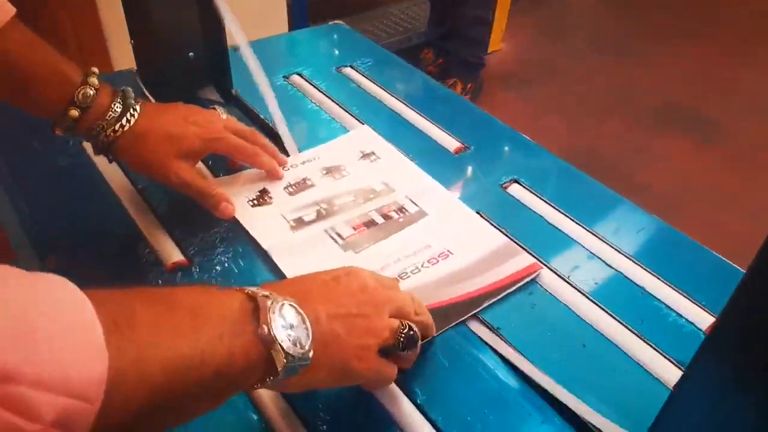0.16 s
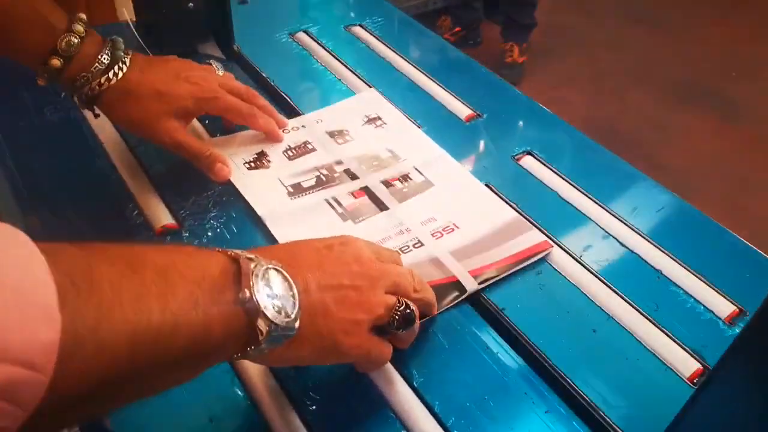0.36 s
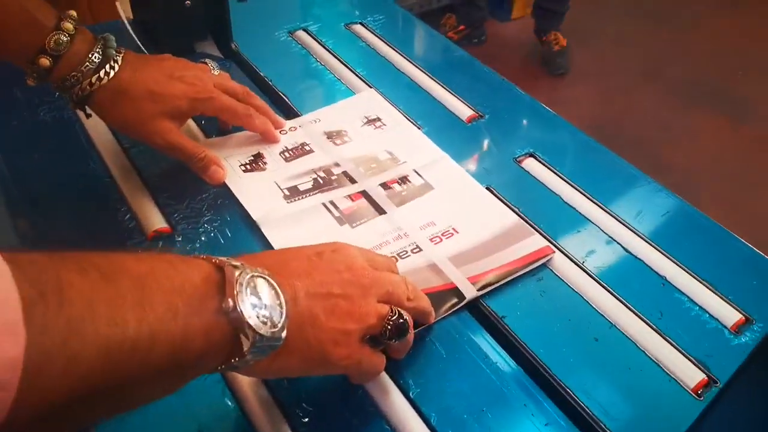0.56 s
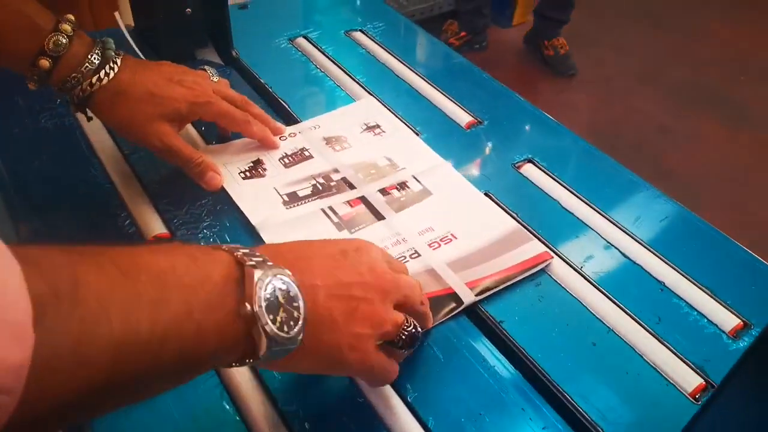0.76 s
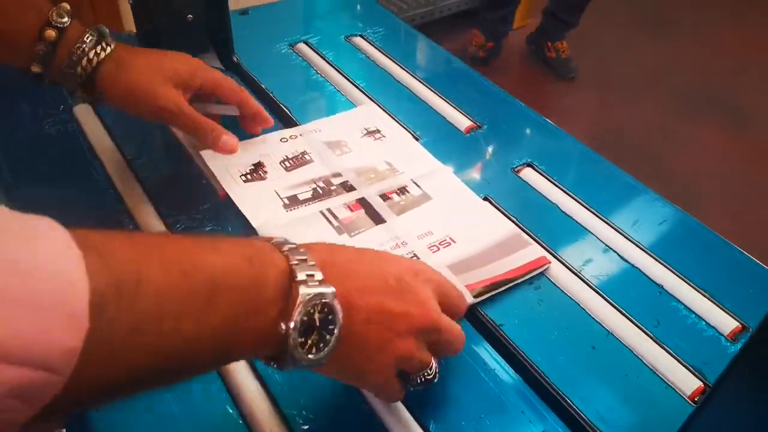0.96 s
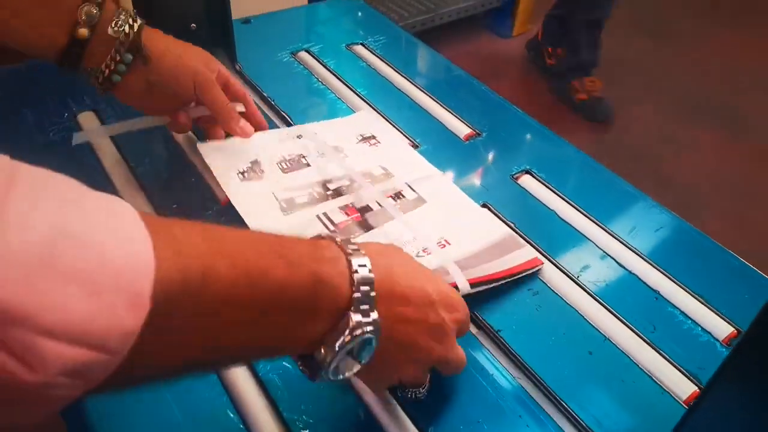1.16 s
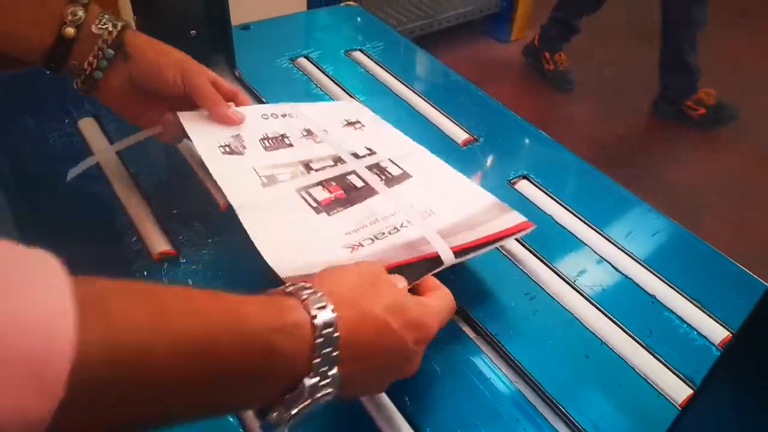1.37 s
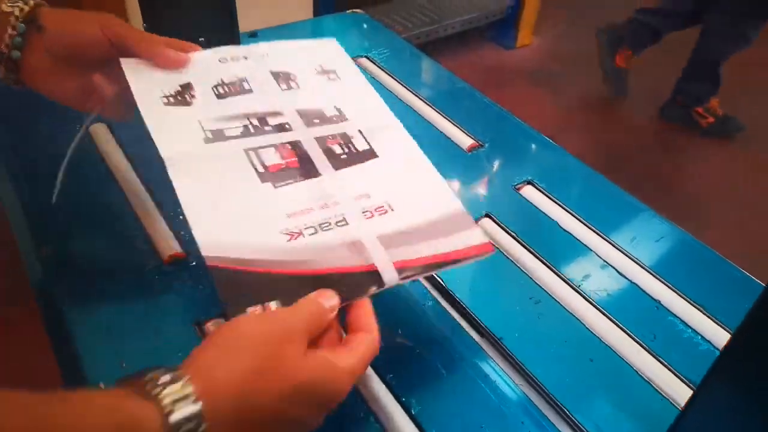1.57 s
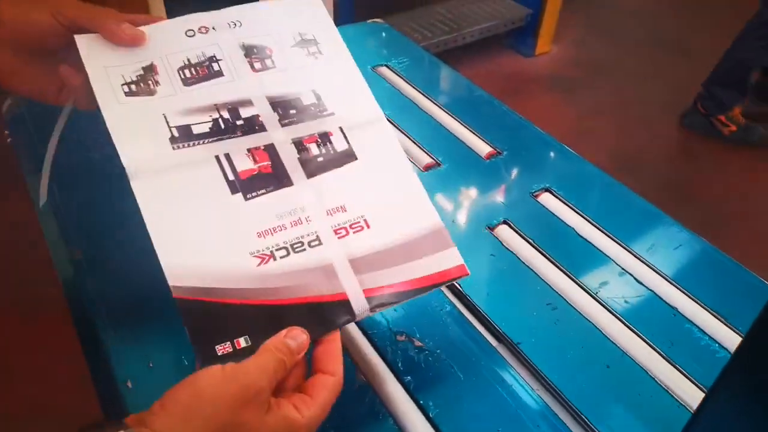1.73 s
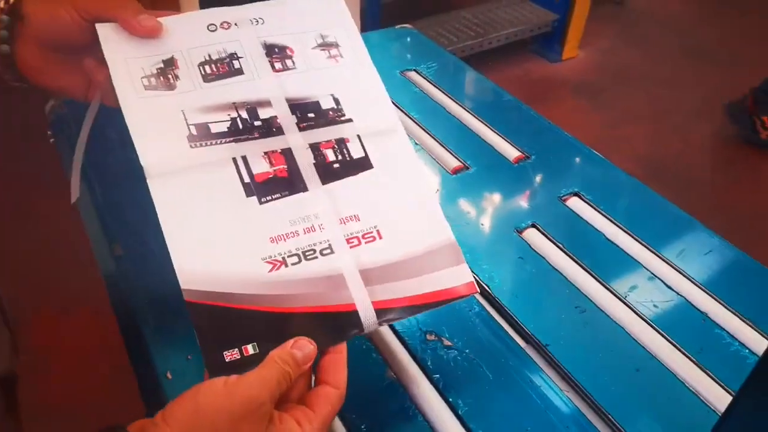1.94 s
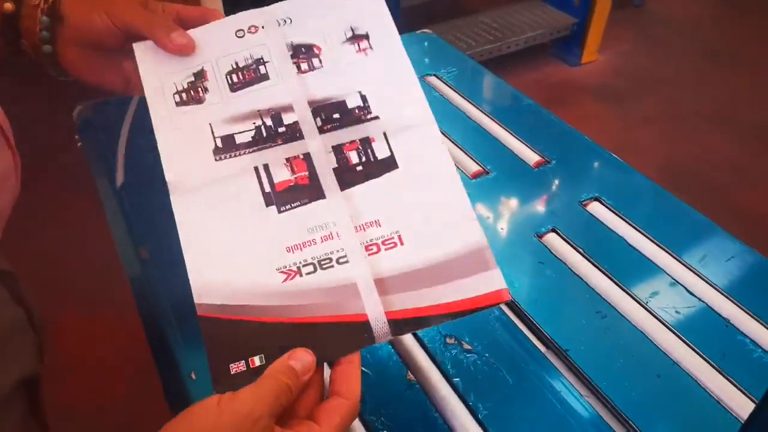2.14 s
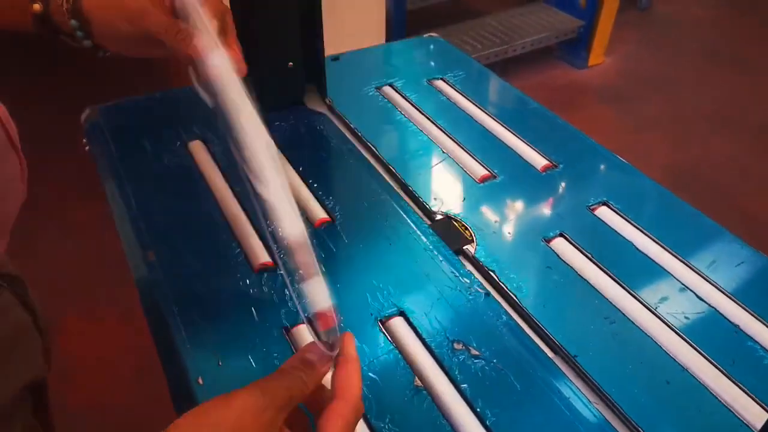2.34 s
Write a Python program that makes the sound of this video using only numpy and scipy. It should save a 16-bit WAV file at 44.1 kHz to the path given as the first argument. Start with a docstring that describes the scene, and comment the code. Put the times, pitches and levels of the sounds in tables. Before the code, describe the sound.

A strapping machine runs through a cycle: metal levers clack over a low gear growl, and rollers spin up twice with a hissing, rising whine. A sharp double snap ends it, heard close by in a quiet, echoing hall.

```python
"""Clacks, a low growl and two rising whines ring out in a quiet hall: a strapping machine
tightens and seals a plastic strap, then feeds a new length. Twice its rollers spin up, the gears
whining while the strap hisses through its guide, and stop with a click. Cams and levers clack in
the steel cabinet, the gearbox growls and a motor hums on."""
import sys
import numpy as np
from scipy import signal
from scipy.fft import rfft, irfft
from scipy.io import wavfile

SR = 44100
rng = np.random.default_rng(int(sys.argv[2]) if len(sys.argv) > 2 else 0)


def inscribe(sig):
    """Save sig as 16-bit PCM at rate SR to the path in sys.argv[1].

    A 1-D sig is mono; a 2-D sig holds one channel per row.
    Samples are clipped to [-1, 1] before scaling.
    """
    pcm = np.round(np.clip(np.atleast_2d(sig).T, -1, 1) * 32767)
    wavfile.write(sys.argv[1], SR, pcm.astype(np.int16))


N = 110250
T = np.arange(N) / SR


def amp(db):
    """Turns decibels into a gain."""
    return 10 ** (np.asarray(db) / 20)


def unit(x):
    """Scales a signal to an average (rms) level of 1."""
    return x / np.sqrt(np.mean(x ** 2) + 1e-20)


def read(points, hz):
    """Reads between the points of a curve over frequency, on a log scale."""
    f, value = np.transpose(points)
    return np.interp(np.log(hz + 1), np.log(f + 1), value)


def level(rows, column=1):
    """Turns a column of dB values over time into a gain for every sample."""
    rows = np.array(rows)
    return amp(np.interp(T, rows[:, 0], rows[:, column]))


def noise(spectrum):
    """Stereo noise shaped by rows of frequency in Hz, level in dB."""
    # Each row: frequency in Hz, how alike left and right are (1 is the same).
    likeness = [(40, 0.24), (130, 1), (400, 0.92), (800, 0.4), (1400, 0.067), (4000, 0.033), (12000, 0.65)]
    hz = np.fft.rfftfreq(N, 1 / SR)
    a, b = rfft(rng.standard_normal((2, N)))
    same = np.clip(read(likeness, hz), -1, 1)
    left = same * a + np.sqrt(1 - same ** 2) * b
    return unit(irfft(np.array([left, a]) * amp(read(spectrum, hz)), N))


def wander(hz):
    """A smooth random wobble, mostly slower than hz."""
    return unit(irfft(rfft(rng.standard_normal(N)) / (1 + (np.fft.rfftfreq(N, 1 / SR) / hz) ** 2), N))


def band(turns, width_hz):
    """A narrow band of noise around a tone; turns counts the tone's cycles."""
    phase = 2 * np.pi * turns
    return unit(wander(width_hz) * np.cos(phase) + wander(width_hz) * np.sin(phase))


def tone(hz):
    """A sine wave that follows a changing pitch."""
    return np.sin(2 * np.pi * np.cumsum(hz) / SR)


def blow(start, rise, decay, hold=0):
    """A level that rises, holds and dies away; all times in seconds."""
    return np.clip((T - start) / rise, 0, 1) * np.exp(-np.maximum(T - start - rise - hold, 0) / decay)


def reflect(x, fade_times, levels):
    """Dense echoes, each frequency dying at its own speed."""
    hz, t, z = signal.stft(rng.standard_normal((2, N)), SR, nperseg=512)
    fall = amp(-60 * t / read(fade_times, hz)[:, None])
    fall *= amp(read(levels, hz))[:, None] / np.sqrt((fall ** 2).sum(1, keepdims=True) * t[1] * SR)
    return signal.fftconvolve(x, signal.istft(z * fall, SR, nperseg=512)[1], axes=1)[:, :N]


def lean(x, share):
    """Tilts the sound to the right, and parts of the high treble to the left."""
    # Each row: frequency in Hz, left minus right in dB at a share of 1.
    balance = [(180, -5), (800, -7.5), (1200, -2.5), (2300, -8), (3500, -15), (5000, -16), (6200, -6.5),
               (7400, 5.5), (8600, 16.5), (11000, -5), (15000, 10.5)]
    ratio = amp(share * read(balance, np.fft.rfftfreq(2 * N, 1 / SR)))
    return irfft(rfft(x, 2 * N) * np.array([ratio, ratio ** 0]) * np.sqrt(2 / (1 + ratio ** 2)))[:, :N]


def workshop():
    """A motor idles over faint room noise, while a ring already in the hall fades."""
    # Each row of these three: frequency in Hz, relative level in dB.
    motor_tones = [(64.6, -76), (167.5, -69.5), (253, -70), (339, -76)]
    room_colour = [(20, -13), (60, -1), (120, 9.5), (260, 17.5), (450, -12), (1000, -33.5), (3500, -7),
                   (7000, -16.5), (10000, -32), (15000, -40)]
    ring_colour = [(500, -9), (1550, -1), (1800, -4.5), (2200, 0.5), (2700, -1), (3800, -5), (7000, -15.5),
                   (10000, -37)]
    hum = sum(amp(db) * np.sqrt(2) * tone(hz * (1 + 0.0024 * wander(8.2))) for hz, db in motor_tones)
    ringing = amp(-41) * noise(ring_colour) + amp(-50) * band(2037 * T, width_hz=14)
    return hum + amp(-66) * noise(room_colour) + np.exp(-T / 0.21) * ringing


def gearbox():
    """The loaded gearbox growls, rattles and shakes the cabinet panels; the frame rumbles."""
    # Each row: time in seconds, relative growl level in dB, relative rattle level in dB.
    load = [(0, -51, -57.5), (.16, -45, -44), (.21, -46.5, -39), (.31, -45.5, -47.5), (.37, -43.5, -44.5),
            (.47, -48, -47), (.56, -47.5, -54.5), (.67, -42, -40.5), (.73, -46.5, -39), (.81, -41.5, -37),
            (.93, -44.5, -57), (1.01, -63, -67), (1.09, -43, -36), (1.17, -39.5, -36.5),
            (1.26, -40.5, -42.5), (1.355, -42.5, -42.5), (1.41, -55, -66), (1.6, -63.5, -40.5),
            (1.68, -70.5, -84)]
    # Each row: time in seconds, rumble level in dB.
    rumble_levels = [(.1, -61), (.45, -61), (.85, -72.5), (1.2, -73.5), (1.3, -57.5), (1.41, -59),
                     (1.47, -65.5), (1.7, -81)]
    # Each row: a panel's pitch in Hz, width in Hz, relative level in dB.
    panel_tones = [(177.7, 24, -8.5), (269.2, 5.6, -13), (582, 15.5, -9.5), (621.3, 19, -10),
                   (798.5, 22, -16), (901, 16, -14.5)]
    # Each row of these three: frequency in Hz, relative level in dB.
    growl_colour = [(25, -36), (60, -18), (110, -4.5), (180, 3), (310, -2), (480, -8), (900, -64.5)]
    rattle_colour = [(250, -3.5), (450, -2), (620, 9), (850, 7.5), (1200, 6), (2200, -8), (4000, -4.5),
                     (7000, -32), (10000, -32.5)]
    rumble_colour = [(22, -8), (55, 6.5), (110, 12), (200, -32.5)]
    low, high = level(load, column=1), level(load, column=2)
    panels = sum(amp(db) * band(hz * T, width / 2) * (low if hz < 400 else high)
                 for hz, width, db in panel_tones)
    growl = amp(-4.5) * low * noise(growl_colour)
    rattle = amp(-4) * high * amp(3.0 * wander(100)) * noise(rattle_colour)
    return growl + rattle + panels + level(rumble_levels) * noise(rumble_colour)


def cam_drive():
    """The cam drive winds up with a short rising tone."""
    start_s, end_s, from_hz, to_hz = 0.032, 0.14, 660, 925
    progress = np.clip((T - start_s) / (end_s - start_s), 0, 1)
    swell = amp(-47) * np.sqrt(abs(np.sin(np.pi * progress)))
    return swell * tone(from_hz + (to_hz - from_hz) * progress) * (1 + 0.22 * wander(50))


def lever_clacks():
    """Each lever lands in a short chatter, thuds in the cabinet and sets the steel ringing."""
    # Each row: start in seconds, thud, clank and click levels in dB, click decay in seconds,
    # ring and tick levels in dB, ring pitch in Hz.
    landings = [(0.178, -40, -40.5, -31.5, 0.024, -55, -45, 4400),
                (.237, -37, -35.5, -26.5, 0.011, -50, -29.5, 4400),
                (0.256, -42.5, -36, -33, 0.049, -45, -68, 4000),
                (.285, -48.5, -37.5, -27.5, 0.022, -60, -28.5, 4000),
                (0.462, -43, -55, -27.5, 0.0045, -48, -31, 4300),
                (0.61, -55, -43.5, -42.5, 0.15, -41, -42, 4300),
                (0.695, -45.5, -60, -51, 0.05, -37.5, -41, 4300),
                (.738, -44.5, -33, -37, 0.03, -35, -52, 4200),
                (1.024, -40.5, -31.5, -39.5, 0.018, -49, -61.5, 2500),
                (1.050, -50.5, -38.5, -30, 0.0074, -48.5, -40.5, 5600),
                (1.0705, -67, -32, -34.5, 0.015, -25, -57, 3900),
                (1.08, -45.5, -36.5, -34, 0.036, -27.5, -48, 5600),
                (1.121, -48.5, -31.5, -22, 0.0099, -18.5, -44.5, 4600),
                (1.134, -42, -35.5, -27, 0.023, -24.5, -49.5, 4200),
                (1.242, -39, -38, -33.5, 0.028, -27, -35.5, 3700),
                (1.2769, -36.5, -35.5, -34.5, 0.039, -27, -43, 3700),
                (1.338, -45.5, -33.5, -28.5, 0.011, -29.5, -58, 3400)]
    # Each row: a lever tone's pitch in Hz, relative level in dB, seconds to fade by 60 dB.
    steel_tones = [(2304, 2, .09), (2750, -3, .06), (3860, 0, .07), (4040, 0, .06), (4204, -3, .05),
                   (4700, -2, .06), (4975, 0, .06), (5330, 0, .07)]
    # Each row of these four: frequency in Hz, relative level in dB.
    thud_colour = [(40, -48.5), (90, -33), (160, -8), (430, -0.5), (620, 3.5), (850, -3), (1300, -7.5),
                   (3000, -61.5)]
    clank_colour = [(300, -61), (700, 7.5), (1100, 10), (1500, 12), (1900, 6), (2400, 9.5), (3200, -5),
                    (6000, -46)]
    click_colour = [(1200, -97), (2800, 2), (3900, 8), (5300, 5.5), (8000, -7.5), (10000, -18),
                    (15000, -60)]
    tick_colour = [(3000, -18), (5500, 8), (8000, 6), (10000, -17), (15000, -18)]
    rise_s = 0.002
    thud, clank, click, tick = np.zeros((4, N))
    ring = np.zeros((2, N))
    steel_hz, steel_db, fade_s = np.transpose(steel_tones)
    t = T[:SR // 8, None]
    for start, thud_db, clank_db, click_db, decay, ring_db, tick_db, ring_hz in landings:
        thud += amp(thud_db) * blow(start, 2 * rise_s, decay=0.029)
        clank += amp(clank_db) * blow(start, rise_s, decay * 1.39)
        click += amp(click_db) * blow(start, rise_s, decay)
        tick += amp(tick_db) * blow(start, rise_s / 2, decay=0.01)
        # Steel tones near this lever's own pitch ring the most.
        weight = amp(steel_db) * np.exp(-.5 * (np.log(steel_hz / ring_hz) / .2) ** 2)
        detuned_hz = steel_hz * (1 + .006 * rng.standard_normal(len(steel_hz)))
        waves = np.sin(2 * np.pi * (detuned_hz * t + rng.random((2, 1, len(steel_hz)))))
        shape = np.minimum(t / (2 * rise_s), 1) * amp(-60 * t / fade_s)
        tones = weight / np.linalg.norm(weight) * shape * waves
        at = round(start * SR)
        ring[:, at:at + len(t)] += 2 * amp(ring_db) * tones.sum(axis=2)
    chatter = unit(amp(0.31 * wander(280)))
    metal = clank * noise(clank_colour) + click * noise(click_colour) + tick * noise(tick_colour)
    return thud * noise(thud_colour) + chatter * metal + ring


def cabinet_knocks():
    """Dull, hollow knocks, each waking one broad tone of the cabinet."""
    # Each row: start in seconds, level in dB, pitch in Hz.
    knocks = [(.205, -39, 583), (.257, -34.5, 700), (.283, -32.5, 470), (0.776, -41, 622),
              (1.281, -36.5, 451.8)]
    return sum(amp(db) * blow(start, rise=0.0048, decay=0.022) * band(hz * T, width_hz=87)
               for start, db, hz in knocks)


def rollers():
    """The gears rasp, then bite into a fluttering whine near top speed; the strap hisses in its guide."""
    # Each row: start and stop in seconds, then relative levels in dB of hiss, undertone and rasp.
    runs = [(0.286, 0.473, -39, -28, -8.5), (1.298, 1.586, -37, -19.5, -6.5)]
    # Two spin-ups, and a sag as the strap meets its stop. Each row: time in seconds, tooth rate in Hz.
    tooth_rates = [(.29, 3450), (.32, 3780), (.35, 4020), (.385, 4140), (.45, 4300), (.50, 4320),
                   (1.30, 2100), (1.338, 2980), (1.357, 3500), (1.39, 3830), (1.425, 4030), (1.455, 4160),
                   (1.546, 4370), (1.556, 3920), (1.58, 4170)]
    # Each row: time in seconds, whine level in dB.
    whine_levels = [(.29, -37), (.341, -34.5), (.351, -23.5), (.364, -30), (.402, -34), (.410, -23),
                    (.432, -31.5), (.465, -28), (.50, -33.5), (1.30, -36), (1.351, -33), (1.358, -27),
                    (1.393, -19.5), (1.401, -29), (1.410, -25), (1.438, -24), (1.468, -28), (1.522, -23.5),
                    (1.545, -35.5), (1.585, -30), (1.605, -49)]
    # Each row: multiple of the tooth rate, relative level in dB.
    harmonics = [(1, 0), (2, -20)]
    # Each row: frequency in Hz, relative level in dB.
    hiss_colour = [(300, -45), (900, -33.5), (1600, 0.5), (4200, 1), (6500, 3), (8300, -2.5), (10000, -21),
                   (12500, -17.5), (15000, -22)]
    top_hz, flutter_hz, flutter_db = 4390, 70, 2.2
    attack_s, release_s, coast_s = 0.009, 0.0057, .03
    sliding, running, undertone, rasp_gain = np.zeros((4, N))
    speed = np.interp(T, *np.transpose(tooth_rates)) / top_hz
    for start, stop, hiss_db, undertone_db, rasp_db in runs:
        rasp_gain = np.where(T > start, amp(rasp_db), rasp_gain)
        rise, after = np.clip((T - start) / attack_s, 0, 1), np.maximum(T - stop, 0)
        sliding += amp(hiss_db) * rise * np.exp(-after / release_s)
        running += rise * np.exp(-after / coast_s)
        undertone += amp(undertone_db) * rise * np.exp(-after / release_s)
    bite = np.clip((speed - .74) / .05, 0, 1)  # 0 is all rasp, 1 brings in the clear tone
    turns = np.cumsum(top_hz * speed * (1 + .007 * wander(104))) / SR
    wobble = tone(flutter_hz * (1 + .5 * wander(52))) + .5 * wander(150)
    flutter = unit(amp(flutter_db * wobble))
    whine = undertone * band(turns / 2, width_hz=60)  # an octave down
    for k, db in harmonics:
        rasp = np.array([band(k * turns * .975, width_hz=300 * k) for _ in range(2)])
        clear = bite * np.sin(2 * np.pi * k * turns)
        whine = whine + amp(db) * (clear + (1 - bite + rasp_gain * k * bite) * rasp)
    whine = whine * flutter * running * level(whine_levels)
    near_echo = reflect(whine, fade_times=[(1000, .07)], levels=[(1000, -10)])
    grain = unit(amp(2.2 * wander(450)))
    return whine + near_echo + sliding * speed ** 0.85 * grain * noise(hiss_colour)


def motor_groans():
    """The motor groans on a low tone while it gets the rollers going."""
    # Each row: start in seconds, level in dB, hold in seconds.
    groans = [(0.295, -43, 0.077), (1.275, -42.5, 0.055)]
    load = sum(amp(db) * blow(start, rise=0.027, decay=0.017, hold=hold) for start, db, hold in groans)
    return load * np.sqrt(2) * tone(279.2 + 6 * wander(63))


def strap_and_latch():
    """The strap snaps against its stop, then the heavier latch shuts, with a low bump on the left."""
    # Each row: start in seconds, crack level in dB, its decay in seconds, bump and body levels in dB.
    snaps = [(1.5464, -15, 0.0016, -41.5, -48), (1.5890, -15.5, 0.005, -30.5, -25)]
    # Each row of these three: frequency in Hz, relative level in dB.
    crack_colour = [(700, -26), (1400, 2.5), (2400, -7), (3600, 7), (4600, 2.5), (8000, -7.5),
                    (10000, -35.5), (15000, -46.5)]
    body_colour = [(150, -15.5), (700, 0.5), (1400, 4.5), (2400, -1), (3500, 3.5), (6000, 3), (9000, -32)]
    bump_colour = [(15, 15), (45, -5.5), (90, -13), (200, -8.5), (600, -72)]
    rise_s = 0.0015
    crack, bump, body = np.zeros((3, N))
    for start, crack_db, decay, bump_db, body_db in snaps:
        crack += amp(crack_db) * blow(start, rise_s, decay)
        bump += amp(bump_db) * blow(start, rise_s, decay=0.0099)
        body += amp(body_db) * blow(start, rise_s, decay=0.019)
    squashed = unit(np.tanh(noise(crack_colour) / 2))
    return crack * squashed + body * noise(body_colour) + bump * noise(bump_colour) * amp([[3], [-13]])


def scene():
    """The machine close by, the echoing hall around it."""
    # Each row: frequency in Hz, seconds for the echo to fade by 60 dB.
    hall_fades = [(100, 3), (300, 2.5), (2000, 2), (4000, 1.5), (6000, 1.13), (8500, 1.0), (14000, 0.7)]
    # Each row: frequency in Hz, echo level in dB.
    hall_levels = [(100, -16.5), (250, -6), (600, -5.5), (1500, -10), (2800, -6.5), (3700, -11),
                   (4300, -14), (5200, -9.5), (9000, -11), (14000, -14)]
    machine = gearbox() + cam_drive() + lever_clacks() + cabinet_knocks()
    machine += rollers() + motor_groans() + strap_and_latch()
    hall = reflect(machine, hall_fades, hall_levels) + workshop()
    return lean(machine, share=0.8) + lean(hall, share=0.65)


def record(dry):
    """Cuts off the very highest treble."""
    low_pass = signal.firwin(401, cutoff=15400, window=("kaiser", 8), fs=SR)
    return signal.oaconvolve(dry, low_pass[None], "same")


dry = scene()
out = record(dry)
inscribe(out)
```